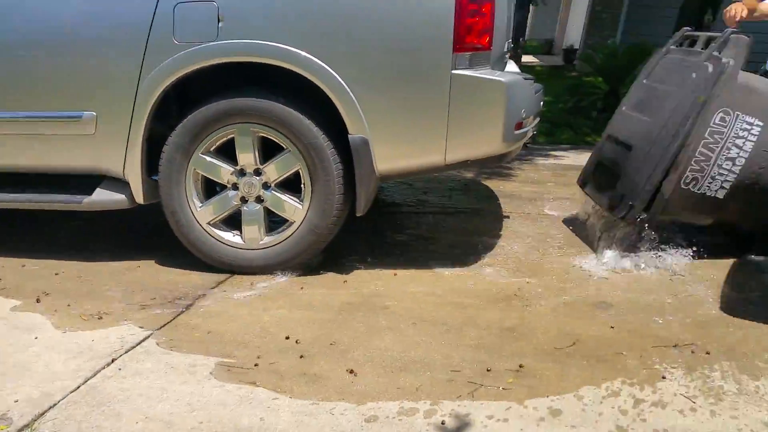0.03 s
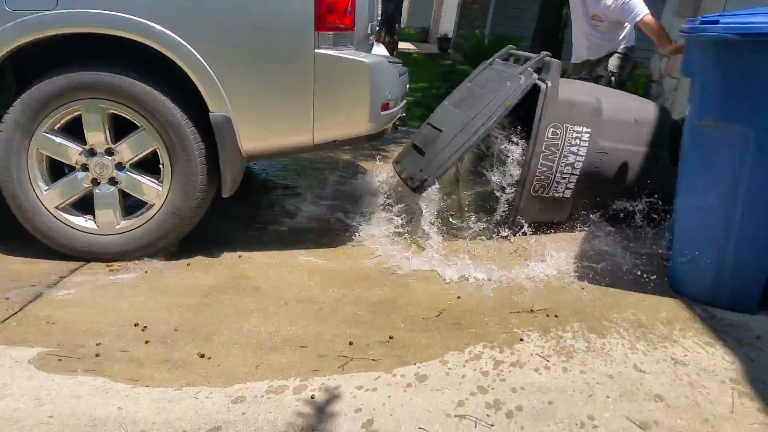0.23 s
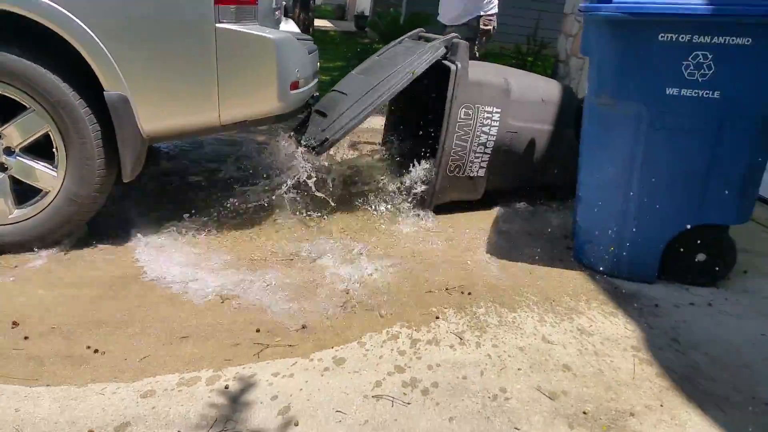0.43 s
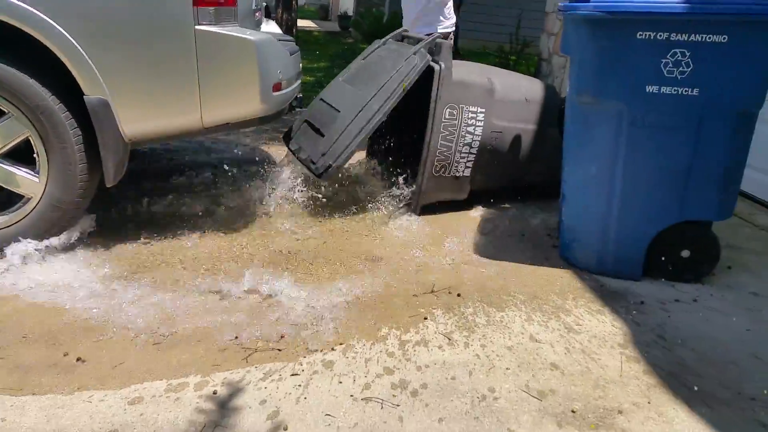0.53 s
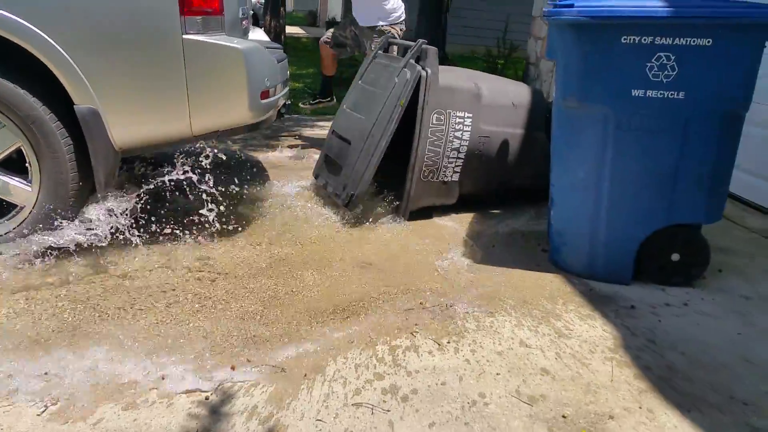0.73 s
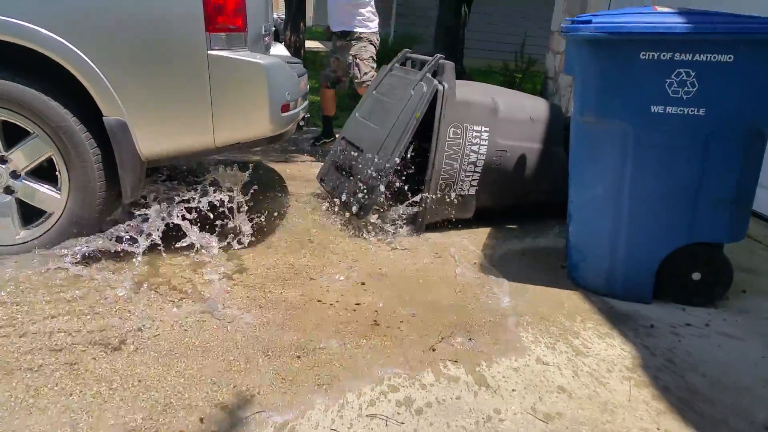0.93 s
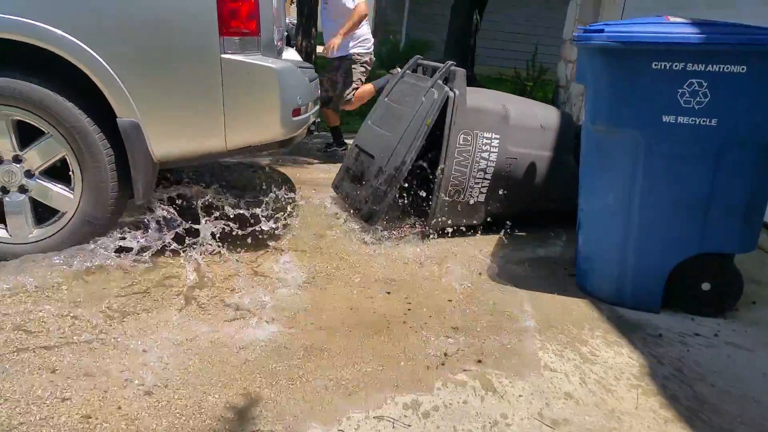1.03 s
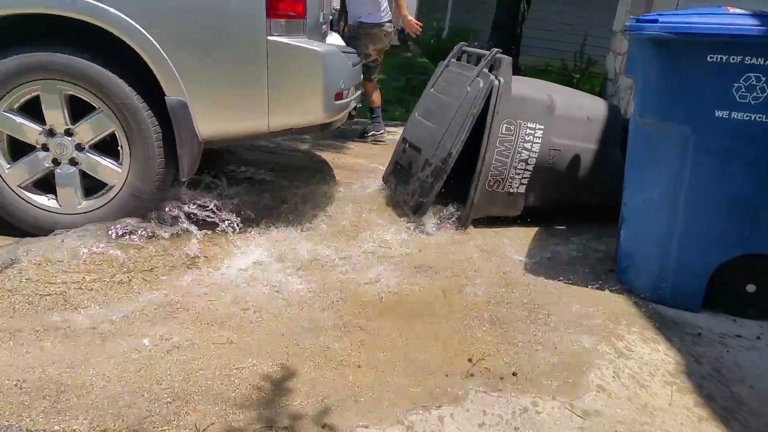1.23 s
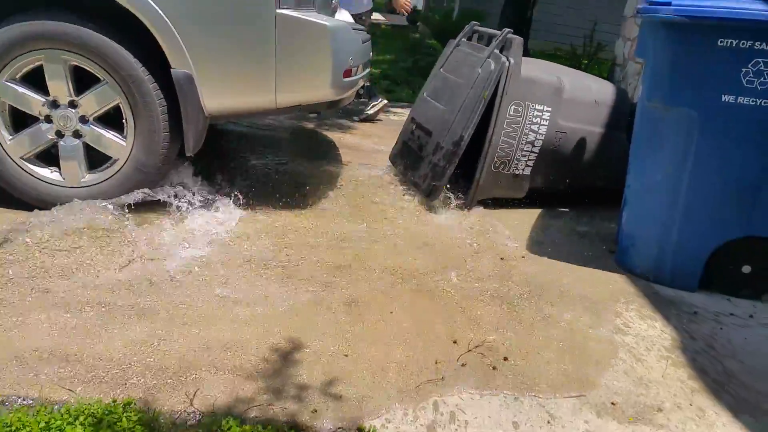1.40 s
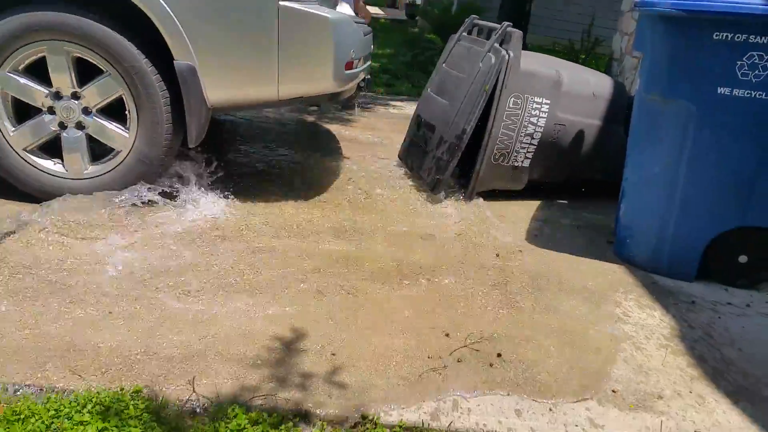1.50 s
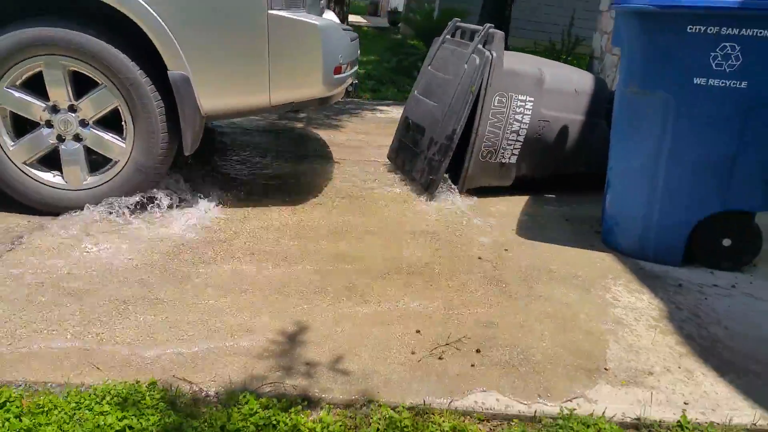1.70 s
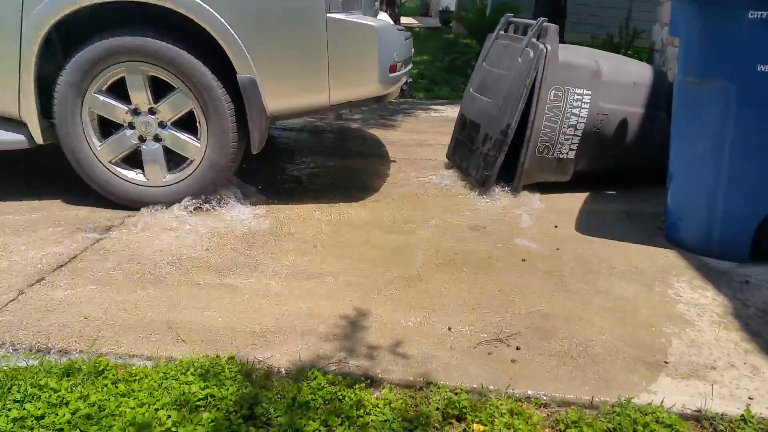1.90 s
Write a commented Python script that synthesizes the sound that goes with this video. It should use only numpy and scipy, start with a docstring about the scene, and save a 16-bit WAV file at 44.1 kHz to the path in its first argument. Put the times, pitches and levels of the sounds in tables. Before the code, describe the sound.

Water gushes across concrete as a plastic bin tips over with a hollow thump.

```python
"""A plastic wheelie bin full of water tips over on a concrete driveway.
Water jets from the lid and the wet plastic squeaks. At 0.24 s the bin lands: blows ring its hollow
shell, it bounces, then judders to rest by stick-slip. The jet gives way to a flood that rushes over
the concrete with ticking drops and ringing bubbles. From about 1.2 s the water piles up against
a car's tyre, rains back in bright drops and gurgles."""
import sys
import numpy as np
from scipy import signal
from scipy.fft import rfft, irfft
from scipy.io import wavfile
from scipy.ndimage import uniform_filter1d

SR = 44100
rng = np.random.default_rng(int(sys.argv[2]) if len(sys.argv) > 2 else 0)


def generate_wav(sig):
    """Save sig (samples, or channels by samples) to the path in sys.argv[1] as 16-bit PCM at SR."""
    pcm = np.round(np.clip(np.atleast_2d(sig).T, -1, 1) * 32767).astype(np.int16)
    wavfile.write(sys.argv[1], SR, pcm)


N = 85995

# bin strikes concrete: start_s, thud_db, crack_db, contact_ms
BLOWS = [(.2396,-13.5,-12.5,.45),(.247,-11,-20,1.7),(.262,-12,-17,.8),(.2718,-12,-20,.9),(.2886,-14.5,-32,.4),(.3273,-12,-32,1.4),(.3416,-20,-34,.4),(.3795,-16,-19,1.7),(.3931,-17,-29,.35),(.436,-12,-33,1.3),(.4666,-24,-32,.9),(.5048,-24,-30,.4),(.5247,-20,-34,1.0),(.57,-23,-36,.6),(.6079,-26,-40,.4),(.6573,-31,-33,.5)]
# modes of the hollow shell and clacking walls: pitch_hz, gain_db, t60_s
SHELL_MODES = [(70,-13.5,.16),(114.6,2.2,.33),(169.3,4.5,.1),(219,2.5,.13),(272.8,-9.8,.25),(320.3,1.3,.19),(344.8,-1.3,.17),(422,-5,.2),(530,-13,.1)]
WALL_MODES = [(928,-10,.12),(1062,1,0.11),(1360,-33,.1)]
# rim crack and scrape spectra: freq_hz, gain_db
CRACK_LEFT = [(100,-31),(330,10.5),(650,-9),(1000,4),(1600,-7.5),(2300,-0.5),(3300,-12),(5000,-17),(6500,-18),(8500,-25)]
CRACK_RIGHT = [(100,-5),(330,8),(650,-11.5),(1000,5),(1600,-13),(2300,-10),(3300,-14),(5000,-28),(6800,-15.5),(8500,-29)]
SCRAPE_COLOUR = [(25,-51),(50,-31),(85,7.5),(150,5.5),(380,-2),(520,-8.5),(700,-8.5),(950,-10.5),(1250,-12.5),(1600,-17.5),(4000,-29),(9000,-42)]
# water envelope: time_s, splash_db, spray_db
RUSH_LEVEL = [
    (0.0, -39, -32), (0.054, -38.5, -37), (0.106, -36.5, -28), (0.17, -35.5, -34), (0.182, -34, -26),
    (0.214, -31.5, -35), (0.232, -38.5, -56), (0.3, -37.5, -46), (0.332, -40, -39), (0.39, -33, -55),
    (0.528, -35.5, -46), (0.648, -33, -41), (0.658, -32.5, -40), (0.736, -39, -47.5),
    (0.8, -37.5, -45.5), (0.998, -42.5, -48.5), (1.076, -37.5, -45), (1.154, -37.5, -44.5),
    (1.31, -33, -40), (1.38, -37.5, -44), (1.608, -36, -45), (1.926, -32.5, -39.5), (1.95, -30, -36)]
# source envelopes: time_s, level_db
CHURN_LEVEL = [
    (0.0, -39.5), (0.054, -39), (0.068, -39), (0.16, -34), (0.178, -39), (0.2, -31.5), (0.74, -42.5),
    (1.16, -43.5), (1.194, -39.5), (1.46, -44.5), (1.606, -42), (1.686, -39.5), (1.95, -38.5)]
SKID_LEVEL = [(.238,-66),(.256,-21),(.33,-18),(.372,-26),(.395,-18.5),(.46,-20),(.55,-22),(.6,-29),(.683,-27),(.712,-44),(.8,-66)]
GURGLE_LEVEL = [(1.1,-58),(1.36,-42),(1.48,-47),(1.62,-39.5),(1.7,-45.5),(1.8,-34),(1.95,-40)]
FALLING_DROPS_LEVEL = [(1.23,-58),(1.28,-40.5),(1.315,-37.5),(1.35,-45),(1.4,-65)]
RUMBLE_LEVEL = [(0.74,-42.5),(1.056,-52),(1.28,-66),(1.53,-50.5),(1.95,-44.5)]
# lid jet spectra, low body and hiss: freq_hz, gain_db
JET_BODY = [(25,-11),(60,-8),(120,3),(180,1.5),(330,-0.5),(600,-12.5),(1000,-6.5),(1400,-8),(2200,-46),(5000,-60)]
JET_LEFT = [(400,-44),(1000,-15),(1700,0),(2450,5.5),(3000,0),(4000,-1),(5200,-8),(6300,-4),(7600,-17.5),(9500,-13),(12000,-10.5),(15500,-12)]
JET_RIGHT = [(400,-30),(1000,-31),(1700,-13),(2350,-3),(3000,-2.5),(4200,0.5),(5300,-5),(7000,-5.5),(8000,-11.5),(9500,-14.5),(12000,-13.5),(15500,-30)]
# flood spectra: freq_hz, gain_db
CHURN_COLOUR = [(25,-40),(70,-22),(120,-5.5),(170,-2),(350,0.5),(560,-6.5),(850,-1),(1100,-6),(1500,-8),(2200,-2.5),(5000,-61)]
SPLASH_LEFT = [(400,-34),(1000,-4.5),(1700,-2.5),(2350,0),(3000,0),(4000,-3.5),(5200,-10),(6300,-6.5),(7600,-35),(11000,-92)]
SPLASH_RIGHT = [(400,-67),(1000,-1),(1700,-5.5),(2350,-6.5),(3000,-2.5),(4200,-0.5),(5300,-6.5),(7000,-5.5),(8000,-15.5),(11000,-66)]
SPRAY_LEFT = [(3000,-30),(7000,2),(8500,-1.5),(10500,2),(12500,-3),(15500,-2.5)]
SPRAY_RIGHT = [(3000,-50),(7000,1),(8500,2),(10500,0),(12500,-2),(15500,-3.5)]
GURGLE_COLOUR = [(250,-31),(350,14),(520,-7),(800,11),(1020,7),(1250,-15),(1600,16.5),(2300,-18),(2650,10),(2830,18),(3080,-19.5),(5000,-31)]
FALLING_DROPS_COLOUR = [(2500,-30),(4200,4),(5200,-13),(9000,-12),(13000,-6)]
RUMBLE_COLOUR = [(25,-26),(60,-3.5),(100,-3.5),(140,-7.5),(220,-10),(600,-68)]
# water slaps, bin squeak and scrapes, a late gurgle: start_s, level_db, pitch_hz, t60_s
SLAPS_AND_SCRAPES = [(.106,-25,2600,.04),(.131,-24.5,2800,.033),(.381,-24,4500,.03),(.465,-19,1130,.13),(.566,-20,2000,.045),(.624,-29,6600,.03),(.653,-24.5,4100,.05),(.659,-25,2300,.09),(1.0235,-26,1230,.017),(1.057,-27,3300,.008),(1.062,-28,2400,.06),(1.688,-24,850,.17)]
# large bubbles: start_s, level_db, pitch_hz
PLOPS = [(1.19,-27,350),(1.496,-27,1000),(1.692,-26,800),(1.742,-29,800),(1.718,-28,200),(1.734,-25.5,400),(1.817,-24,1950),(1.839,-29,2150)]
# left/right likeness: freq_hz, correlation
BIN_LIKENESS = [(200,0.97),(420,0.92),(650,0.57),(1000,0.91),(1500,0.2),(2400,0.029),(5000,0.16)]
JET_LIKENESS = [(200,.98),(500,.88),(700,.58),(1000,.65),(1500,-.5),(2050,-.15),(2500,.55),(3200,-.55),(4050,.48),(4600,-.1),(5500,-.42),(6150,-.2),(6800,.48),(7650,-.42),(8500,0)]
FLOOD_LIKENESS = [(200,0.96),(420,0.89),(620,0.3),(950,1),(1350,0.47),(1850,0.34),(2700,0.68),(4100,0.054),(15000,0.046)]
# flood reaches the left side first: freq_hz, lead_ms
FLOOD_LEAD = [(100,0.11),(400,0.067),(900,0.16),(1350,0.21),(2400,0.4),(3250,0.44),(6700,0.43)]

LANDING_S = BLOWS[0][0]
LN_1000 = np.log(1000)  # 60 dB of decay


def from_db(db):
    """Decibels to gain."""
    return 10 ** (np.asarray(db) / 20)


def unit_rms(x):
    """Scale to unit power."""
    return x / np.sqrt(np.mean(x ** 2) + 1e-20)


def in_time(rows):
    """Each column of a curve, per sample."""
    time_s, *columns = np.transpose(rows)
    return [np.interp(np.arange(N) / SR, time_s, column) for column in columns]


def per_bin(rows):
    """A spectrum table, per FFT bin."""
    freq_hz, value = np.transpose(rows)
    return np.interp(np.log(np.arange(N // 2 + 1) * SR / N + 1), np.log(freq_hz), value)


def since(start_s):
    """Seconds since start_s, zero before."""
    return np.maximum(np.arange(N) / SR - start_s, 0)


def decay(t_s, t60_s):
    """Exponential decay, silent until t_s > 0."""
    return (t_s > 0) * np.exp(-LN_1000 * t_s / t60_s)


def butter(x, order, edge_hz, kind):
    """Butterworth filter."""
    return signal.sosfilt(signal.butter(order, edge_hz, kind, fs=SR, output="sos"), x)


def drift(rate_hz):
    """Smooth random wander, rms 1."""
    pole = np.exp(-2 * np.pi * rate_hz / SR)
    return unit_rms(signal.lfilter([1], [1, -2 * pole, pole ** 2], rng.standard_normal(2 * N))[N:])


def ring(clicks, pitch_hz, t60_s):
    """Each click starts a damped sine."""
    pole = np.exp(-LN_1000 / (t60_s * SR))
    step_rad = 2 * np.pi * pitch_hz / SR
    feedback = [1, -2 * pole * np.cos(step_rad), pole ** 2]
    return signal.lfilter([0, np.sin(step_rad)], feedback, clicks + 1e-18)


def noise():
    """Two independent white noises."""
    return rng.standard_normal((2, N))


def grains(per_s, spread_db):
    """Two independent streams of random clicks, mostly small."""
    sizes = from_db(spread_db * np.minimum(rng.exponential(1, (2, N)), 5))
    return sizes * rng.choice([-1, 1], (2, N)) * (rng.random((2, N)) < per_s / SR)


def blend(a, b, share):
    """Mix at unit power; share is the part from b."""
    return np.sqrt(1 - share) * unit_rms(a) + np.sqrt(share) * unit_rms(b)


def stereo(pair, left_colour, right_colour, likeness, lead=None):
    """Two independent signals to correlated, coloured sides, rms 1."""
    a, b = rfft(pair)
    mix_rad = np.arcsin(np.clip(per_bin(likeness), -.999, .999)) / 2
    left = (a * np.cos(mix_rad) + b * np.sin(mix_rad)) * from_db(per_bin(left_colour))
    right = (b * np.cos(mix_rad) + a * np.sin(mix_rad)) * from_db(per_bin(right_colour))
    if lead:
        freq_hz = np.arange(len(a)) * SR / N
        right *= np.exp(-2j * np.pi * freq_hz * per_bin(lead) / 1000)
    return unit_rms(irfft(np.array([left, right]), N))


def at_flood(pair, left_colour, right_colour=None):
    """Colour a pair and place it with the flood, on the left."""
    return stereo(pair, left_colour, right_colour or left_colour, FLOOD_LIKENESS, FLOOD_LEAD)


def landing(crack_t60_s=.11):
    """Each blow booms in the shell, duller for longer contact, and cracks at the rim."""
    force, crack_gain = np.zeros((2, N))
    for start_s, thud_db, crack_db, contact_ms in BLOWS:
        t_s = since(start_s)
        push = t_s * np.exp(-2 * t_s / (contact_ms / 1000))
        force += from_db(thud_db) * push / push.sum()
        crack_gain += from_db(crack_db) * decay(t_s, crack_t60_s)
    return shell(force) + crack_gain * stereo(noise(), CRACK_LEFT, CRACK_RIGHT, BIN_LIKENESS)


def shell(force, sag_share=.128, sag_s=.3):
    """Driven bin modes sink in pitch as it settles; it radiates no deep bass."""
    pitch_ratio = 1 - sag_share * np.minimum(since(LANDING_S) / sag_s, 1)
    clock_s = np.cumsum(pitch_ratio) / SR
    out = 0
    for pitch_hz, gain_db, t60_s in [*SHELL_MODES, *WALL_MODES]:
        phasor = np.exp(2j * np.pi * pitch_hz * clock_s)
        pole = np.exp(-LN_1000 / (t60_s * SR))
        amplitude = signal.lfilter([1], [1, -pole], force / phasor + 1e-18)
        out += from_db(gain_db) * (phasor * amplitude).imag
    return butter(out, 4, 55, "high")


def skid(judder_db=-3.5, scrape_db=1):
    """Stick-slip on concrete: uneven jolts into the shell, plus a gritty scrape."""
    level_db, = in_time(SKID_LEVEL)
    slips = grains(per_s=260, spread_db=3.5)[0]
    judder = shell(butter(slips, 1, 230, "low"))
    judder /= np.sqrt(uniform_filter1d(judder ** 2, size=1500) + 1e-9)  # even out the level
    scrape = stereo(grains(per_s=900, spread_db=2.35), SCRAPE_COLOUR, SCRAPE_COLOUR, BIN_LIKENESS)
    return from_db(level_db) * (from_db(judder_db) * judder + from_db(scrape_db) * scrape)


def water(flutter_db=.3):
    """The jet crossfades into the flood; their level flutters slightly."""
    splash_db, spray_db = in_time(RUSH_LEVEL)
    churn_db, = in_time(CHURN_LEVEL)
    flood_share, = in_time([(.24, .092), (.6, .97)])
    on_ground = np.sqrt(flood_share) * flood(churn_db + 4.2, splash_db + 3, spray_db + 3)
    from_lid = np.sqrt(1 - flood_share) * jet(churn_db + 5.5, splash_db + 7)
    return (on_ground + from_lid) * from_db(flutter_db * drift(rate_hz=34.3))


def flood(churn_db, splash_db, spray_db, bubble_share=.17):
    """Water over concrete: bubbly splash, fine spray, low churn."""
    splash_drops = at_flood(patter(), SPLASH_LEFT, SPLASH_RIGHT)
    small_bubbles = at_flood(bubbles(low_hz=1084, high_hz=7090, per_s=1500), SPLASH_LEFT, SPLASH_RIGHT)
    splash = blend(splash_drops, small_bubbles, bubble_share)
    spray = at_flood(patter(), SPRAY_LEFT, SPRAY_RIGHT)
    churn_drops = at_flood(patter(), CHURN_COLOUR)
    big_bubbles = at_flood(bubbles(low_hz=221.9, high_hz=1599, per_s=450), CHURN_COLOUR)
    churn = blend(churn_drops, big_bubbles, bubble_share)
    return from_db(churn_db) * churn + from_db(splash_db) * splash + from_db(spray_db) * spray


def jet(body_db, hiss_db):
    """Water pours from the lid: low body, bright hiss."""
    body = stereo(patter(), JET_BODY, JET_BODY, JET_LIKENESS)
    hiss = stereo(patter(), JET_LEFT, JET_RIGHT, JET_LIKENESS)
    return from_db(body_db) * body + from_db(hiss_db) * hiss


def patter():
    """Drops tick on concrete over the hiss of the water sheet."""
    return blend(noise(), grains(per_s=3500, spread_db=1.5), share=.6)


def bubbles(low_hz, high_hz, per_s, t60_cycles=79, size_count=48):
    """Bubbles of random size, each ringing at its own pitch."""
    clicks = grains(per_s, spread_db=3.5)
    sizes = rng.integers(0, size_count, (2, N))
    return sum(pitch_hz * ring(clicks * (sizes == size), pitch_hz, t60_cycles / pitch_hz)
               for size, pitch_hz in enumerate(np.geomspace(low_hz, high_hz, size_count)))


def gurgle():
    """The flood folds over at the tyre and traps ringing bubbles."""
    level_db, = in_time(GURGLE_LEVEL)
    trapped = bubbles(low_hz=294, high_hz=2980, per_s=650, t60_cycles=28)
    return from_db(level_db) * at_flood(trapped, GURGLE_COLOUR)


def slaps_and_scrapes(edge_ratio=1.25):
    """Band-noise bursts: water slaps, plastic squeaking and scraping on concrete, a late gurgle."""
    out = 0
    for start_s, level_db, pitch_hz, t60_s in SLAPS_AND_SCRAPES:
        burst = unit_rms(butter(noise(), 2, [pitch_hz / edge_ratio, pitch_hz * edge_ratio], "band"))
        out += from_db(level_db) * decay(since(start_s), t60_s) * burst
    return out


def plops(t60_s=.042, rise_per_s=3.2):
    """Large bubbles ring and rise in pitch."""
    out = 0
    for start_s, level_db, pitch_hz in PLOPS:
        t_s = since(start_s)
        phase_rad = 2 * np.pi * pitch_hz * t_s * (1 + rise_per_s * t_s / 2)
        out += from_db(level_db) * decay(t_s, t60_s) * np.sin(phase_rad)
    return out


def squeak(start_s=.2125, length_s=.0115, pitch_hz=1000, fall_hz_per_s=4000, level_db=-13):
    """Wet plastic chirps once, just before the landing."""
    t_s = np.minimum(since(start_s), length_s)
    swell = np.sqrt(np.abs(np.sin(np.pi * t_s / length_s)))
    return from_db(level_db) * swell * np.sin(2 * np.pi * t_s * (pitch_hz - fall_hz_per_s * t_s / 2))


def falling_drops():
    """Water thrown up at the tyre rains back in separate bright drops."""
    level_db, = in_time(FALLING_DROPS_LEVEL)
    return from_db(level_db) * at_flood(grains(per_s=900, spread_db=3), FALLING_DROPS_COLOUR)


def rumble(gain_db=2.5):
    """Low noise from the landing on; ebbs, then swells."""
    level_db, = in_time(RUMBLE_LEVEL)
    low_noise = stereo(noise(), RUMBLE_COLOUR, RUMBLE_COLOUR, BIN_LIKENESS)
    return (since(LANDING_S) > 0) * from_db(level_db + gain_db) * low_noise


def scene():
    """The water and the bin, summed."""
    spill = water() + gurgle() + falling_drops() + rumble() + plops()
    return spill + slaps_and_scrapes() + squeak() + landing() + skid()


def record(dry):
    """Low cut, soft clip, steep high cut."""
    low_cut_hz, ceiling, high_cut_hz = 30, 1.1, 15900
    rounded = ceiling * np.tanh(butter(dry, 2, low_cut_hz, "high") / ceiling)
    return signal.sosfilt(signal.ellip(12, .1, 80, high_cut_hz, fs=SR, output="sos"), rounded)


dry = scene()
out = record(dry)
generate_wav(out)
```